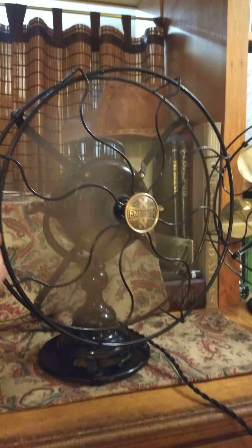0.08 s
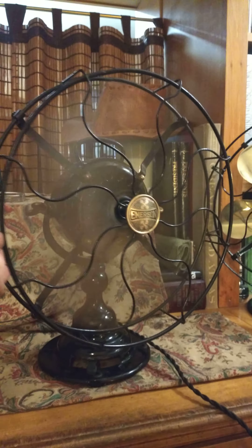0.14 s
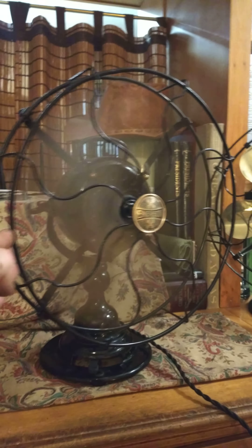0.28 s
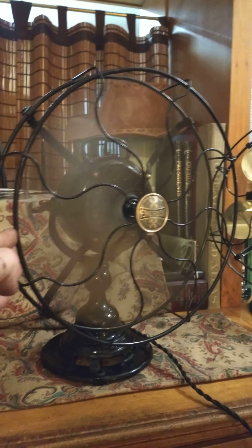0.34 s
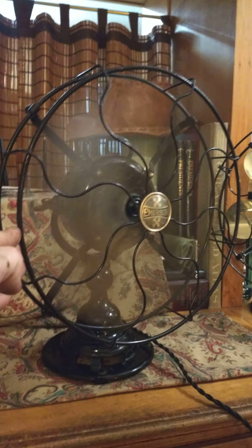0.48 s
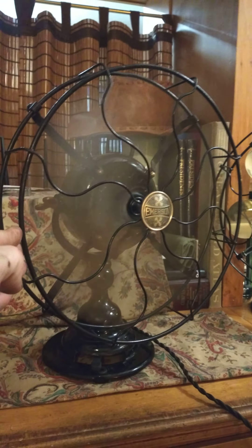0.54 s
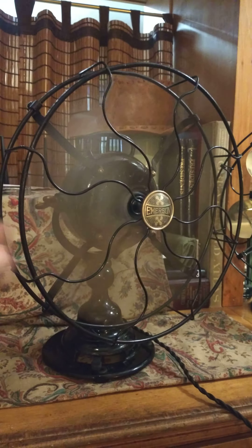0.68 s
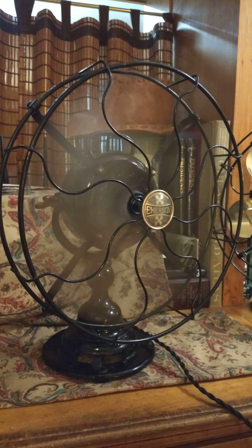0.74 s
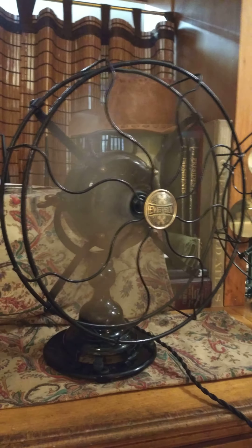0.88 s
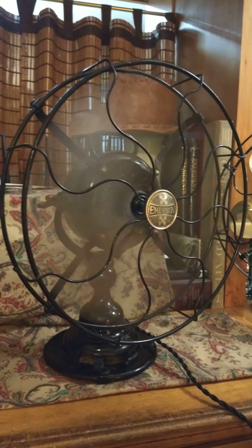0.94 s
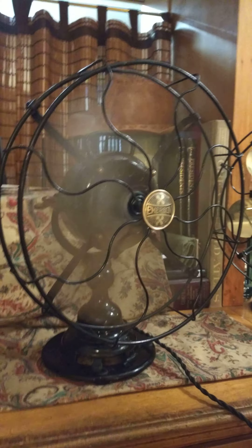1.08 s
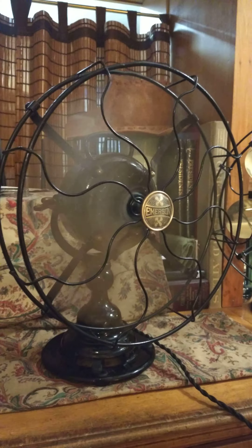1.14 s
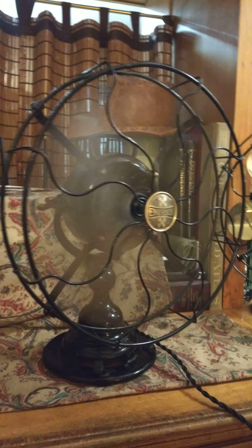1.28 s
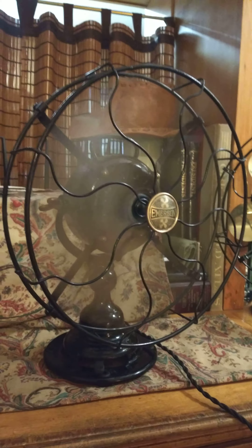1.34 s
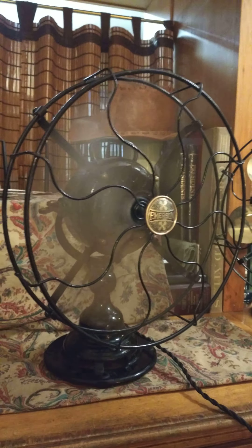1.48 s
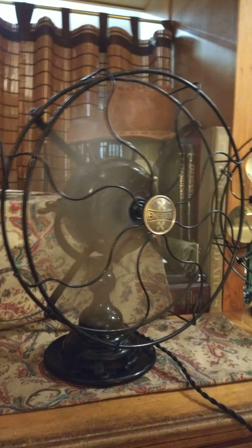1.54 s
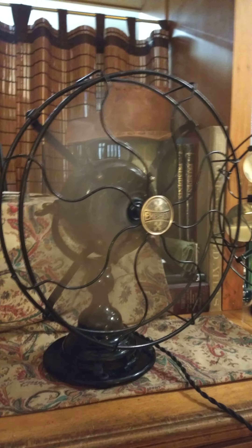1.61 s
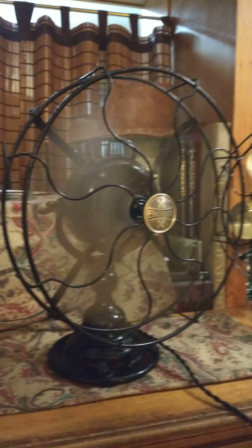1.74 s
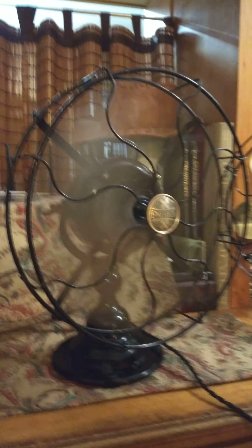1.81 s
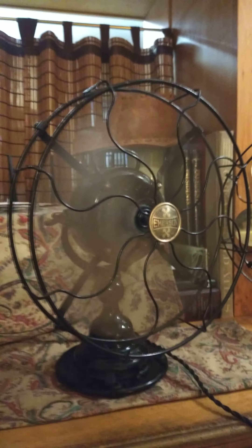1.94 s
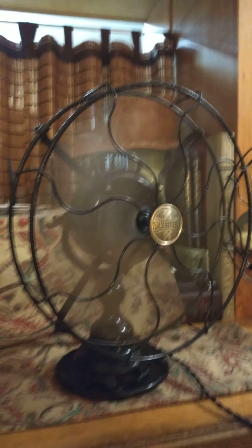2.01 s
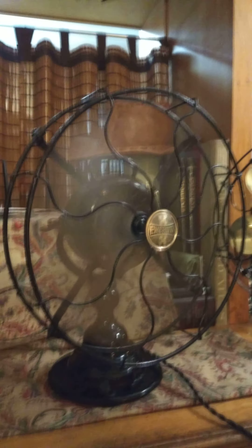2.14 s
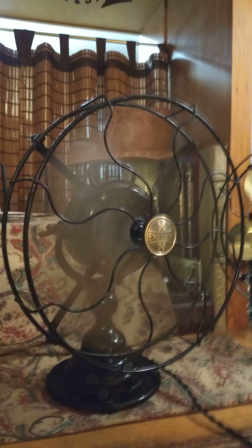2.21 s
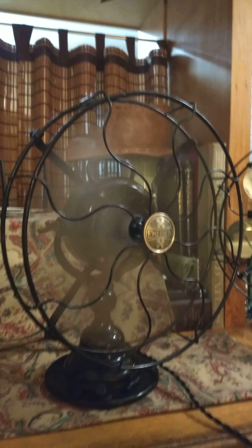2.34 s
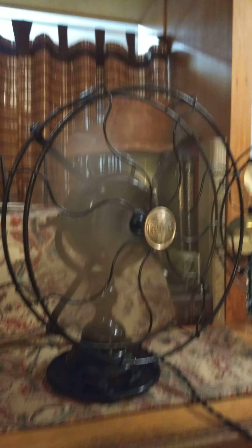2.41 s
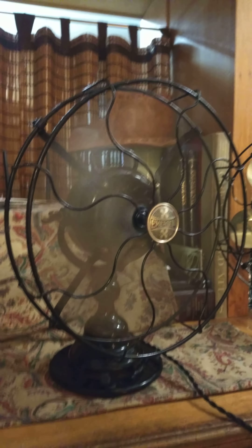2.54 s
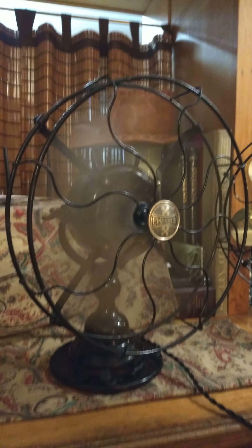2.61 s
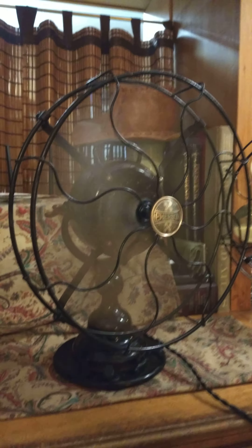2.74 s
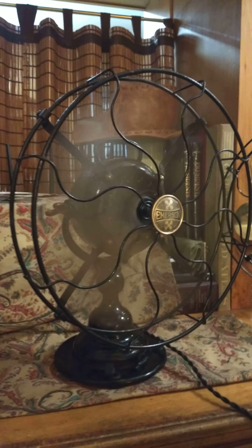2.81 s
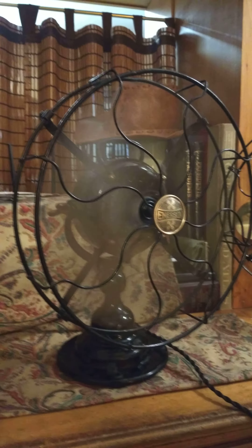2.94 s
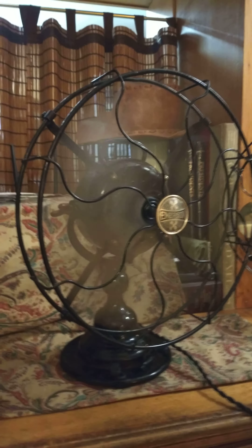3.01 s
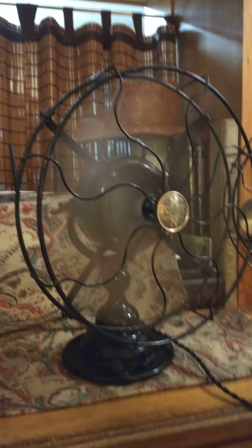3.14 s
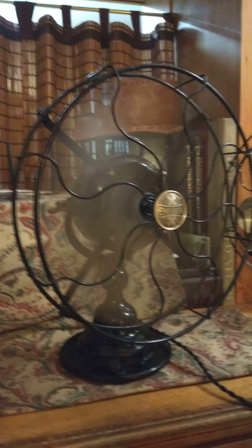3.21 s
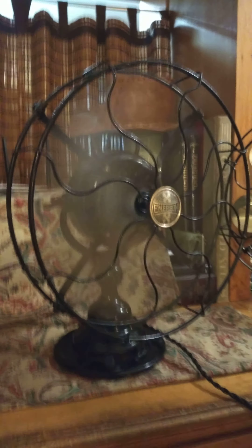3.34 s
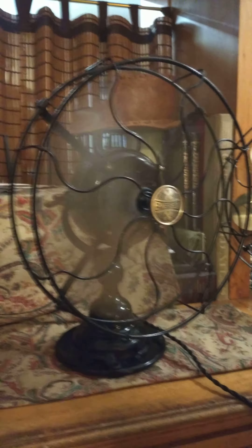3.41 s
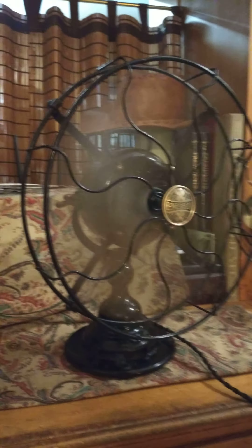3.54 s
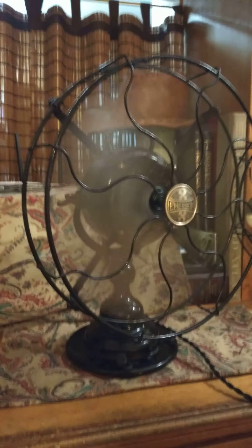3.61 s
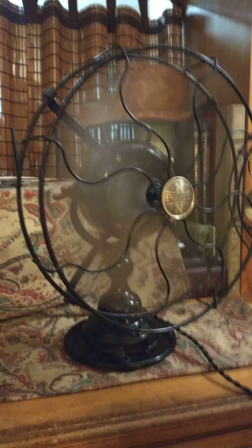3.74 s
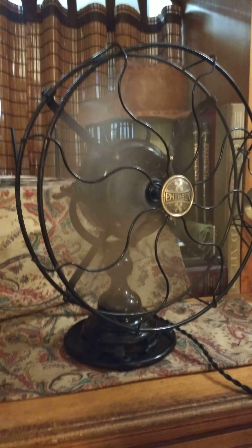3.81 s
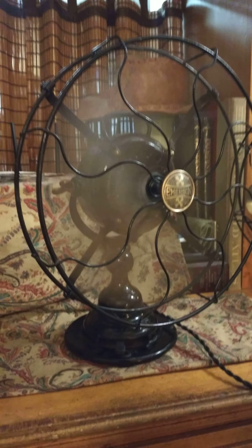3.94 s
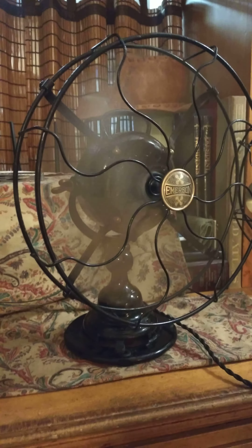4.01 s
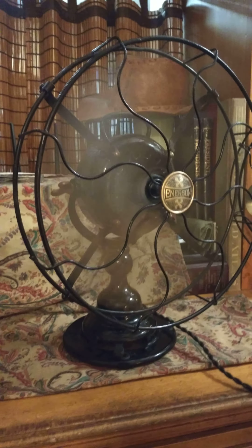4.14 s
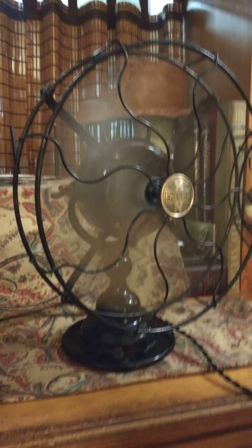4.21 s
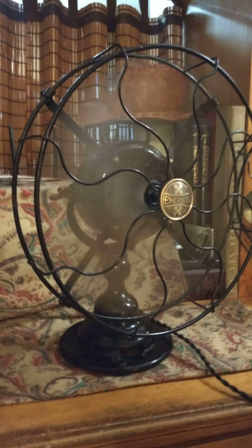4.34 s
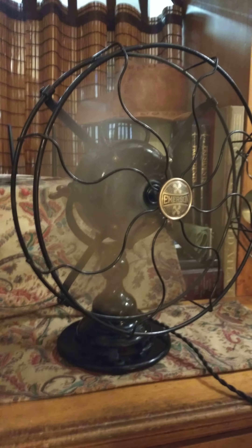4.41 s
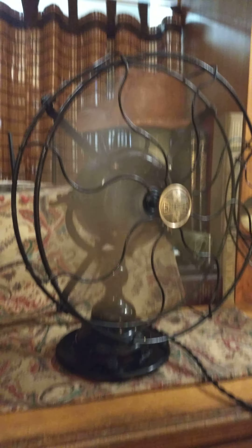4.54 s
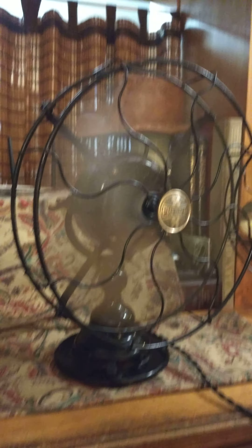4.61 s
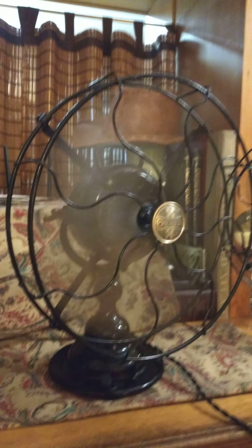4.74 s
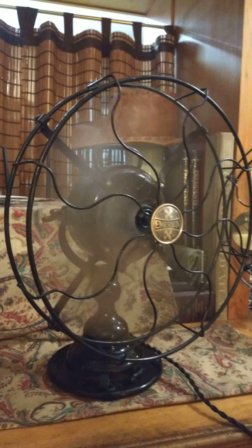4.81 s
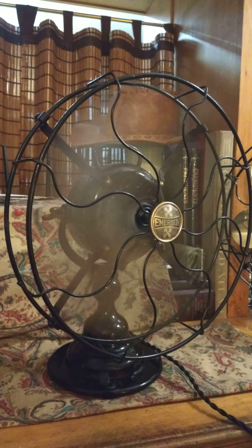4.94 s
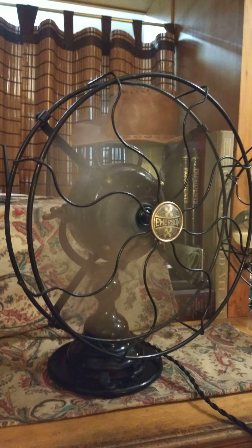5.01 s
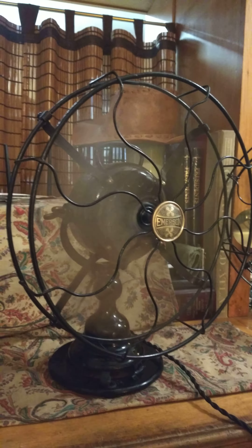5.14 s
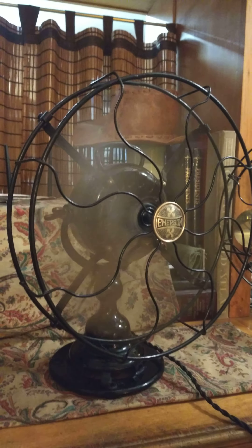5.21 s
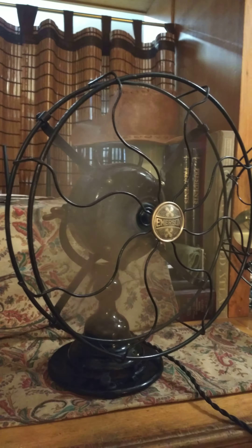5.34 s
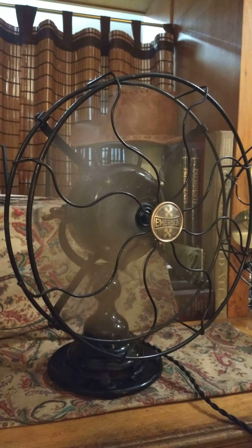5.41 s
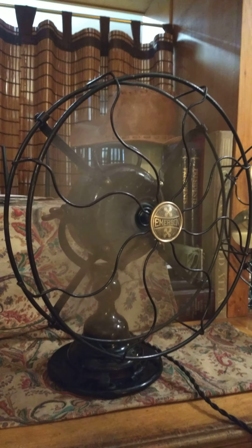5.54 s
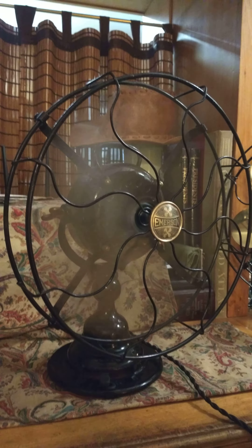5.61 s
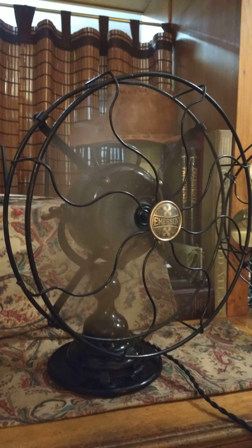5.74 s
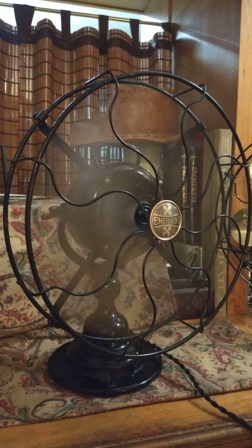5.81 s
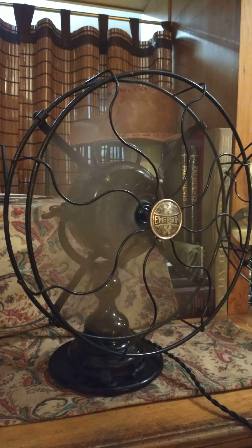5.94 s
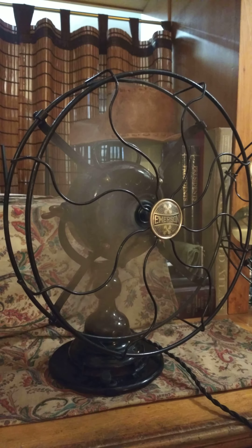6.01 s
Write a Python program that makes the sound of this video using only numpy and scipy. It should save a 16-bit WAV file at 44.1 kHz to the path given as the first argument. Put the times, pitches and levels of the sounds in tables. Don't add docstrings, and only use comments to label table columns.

```python
import sys
import numpy as np
from scipy import signal
from scipy.fft import rfft, irfft, next_fast_len
from scipy.io import wavfile
from scipy.ndimage import uniform_filter1d

SR = 44100
rng = np.random.default_rng(int(sys.argv[2]) if len(sys.argv) > 2 else 0)


def convert_level_to_amplitude(level_db):
    exponent = np.asarray(level_db, float) / 20
    return 10 ** exponent


def inscribe(sig):
    pcm = np.round(np.clip(np.atleast_2d(sig).T, -1, 1) * 32767)
    wavfile.write(sys.argv[1], SR, pcm.astype(np.int16))


N = 267687
TIME = np.arange(N) / SR
SHAFT_HZ = 27.45
PORT_LAG = 20.06


def curve(table):
    s, *columns = np.transpose(table)
    return [np.interp(TIME, s, c) for c in columns]


def over(hz, table):
    f, *columns = np.transpose(table)
    return [np.interp(np.log(hz + 1), np.log(f), c) for c in columns]


def walk(rate):
    k = int(SR / rate)
    held = np.repeat(rng.standard_normal(N // k + 1), k)
    return 1.04 * uniform_filter1d(uniform_filter1d(held, k), k)[:N]


def swells(table):
    return sum(db * np.exp(-((TIME - s) / half) ** 2) for s, db, half in table)


def grip():
    slip_s, release_s, loosen_s = 1.945, 2.03, 0.2
    s = [0, slip_s, slip_s + .012, release_s, release_s + loosen_s]
    return np.clip(np.interp(TIME, s, [0.68, 0.62, 0.42, 0.64, 0]), 0, 1)


def ports(hz):
    # f/Hz, share heard alike (+) or opposite (-), share of the rest that reaches the right port first
    # [0-1] cupped, same open, left minus right level/dB
    coherence = [(60, 0.22, .5, .5, 8), (150, 0.64, 1, 0.45, -5.5), (420, 1, 1, 0.59, 0.5),
                 (573, 0.52, 1, 0.4, 1), (784, 0.99, 0.32, 0.74, -1), (1100, 0.9, 0.39, 0.67, -0.9),
                 (1450, 0.86, 1, 0.77, 3), (1613, -0.079, 1, 0.69, 4.5), (1845, 0, 0.85, 0.69, -3.5),
                 (3350, -0.00055, 1, 0.9, -1.5), (3990, -0.15, 0.59, 0.69, 3),
                 (4750, -0.12, 0.98, 0.55, -6), (5700, 0.028, 0.58, 0.94, 0), (7800, 0.029, 1, 0.79, -3)]
    diffuse_db = -11.5
    alike, *firsts, pan_db = over(hz, coherence)
    sign, alike = np.sign(alike), np.clip(abs(alike), 0, 1)
    both, a, b, *room = rfft(rng.standard_normal((5, next_fast_len(N))))
    late = np.exp(-2j * np.pi * hz * PORT_LAG / SR)
    diffuse = convert_level_to_amplitude(diffuse_db) * np.sqrt((1 - alike) / (1 + (hz / 4000) ** 4)) * np.array(room)
    shared = np.sqrt(alike) * both
    out = []
    for first in np.clip(firsts, 0, 1):
        ahead = a * np.sqrt((1 - alike) * first)
        behind = b * np.sqrt((1 - alike) * (1 - first))
        left = shared + ahead * late + behind
        right = sign * shared - ahead - behind * late
        out.append(np.array([left * convert_level_to_amplitude(pan_db / 2), right * convert_level_to_amplitude(-pan_db / 2)]) + diffuse)
    return out


def rush(level_db, treble_db, cupped):
    # f/Hz, level/dB per Hz
    cupped_colour = [(40, -20), (95, -22), (190, -8), (420, -0.6), (600, -10.5), (850, -1.5), (1150, -0.5),
                     (1450, -0.7), (1850, 6), (3050, -30), (4000, -11), (8600, -29), (10000, -24.5),
                     (15500, -33)]
    # f/Hz, level/dB per Hz
    open_colour = [(40, -24), (95, -19), (190, -9.5), (420, -2.5), (600, -7.5), (950, -0.5), (1150, 0.0),
                   (1650, -4), (2150, -9.5), (2900, -9), (4900, -18.5), (5900, -16), (8500, -29.5),
                   (15500, -29)]
    # f/Hz, modulation depth per turn, depth per blade
    throb_depth = [(100, 0.055, 0.04), (500, 0.029, 0.018), (1200, 0.12, 0.16), (4000, 0.011, 0.13),
                   (10000, 0.024, 0.083)]
    # f/Hz, level/dB
    flicker = [(60, -4), (400, 1), (1200, 1.23), (4000, 1), (12000, 1.56)]
    size = next_fast_len(N)
    hz = np.arange(size // 2 + 1) * SR / size
    pairs = zip(ports(hz), (cupped_colour, open_colour))
    colours = [noise * convert_level_to_amplitude(over(hz, colour)[0]) for noise, colour in pairs]
    turn = 2 * np.pi * SHAFT_HZ * TIME
    shaft_throb = np.cos(turn) + 0.5 * np.cos(2 * turn + 2.6) + .5 * np.cos(3 * turn + 3.9)
    blade_throb = np.cos(4 * turn) + 0.5 * np.cos(8 * turn)
    gust, eddy, out = walk(14), walk(160), 0
    for centre in 2 ** np.arange(5, 14.6, .5):
        band = np.sqrt(np.clip(1 - abs(np.log2((hz + 1) / centre)) * 2, 0, 1))
        near, free = (irfft(c * band, size)[:, :N] for c in colours)
        per_turn, per_blade = over(centre, throb_depth)
        throb = 1 + per_turn * shaft_throb + per_blade * blade_throb
        db = over(centre, flicker)[0] * (0.6 * eddy + 0.56 * walk(150))
        db = db + 0.26 * gust + 0.083 * walk(4.7)
        db = db + treble_db * np.clip(np.log2(centre / 1800) / 0.63, 0, 1)
        out = out + (cupped * near + (1 - cupped) * free) * throb * convert_level_to_amplitude(db)
    return out * convert_level_to_amplitude(level_db + 13.5)


def puffs():
    # t/s, peak level/dB, f/Hz
    eddies = [(0.899, -21, 940), (1.994, -17.5, 906), (2.068, -21, 1230), (2.205, -18.5, 1320),
              (2.412, -14, 1180), (2.447, -13.5, 1180), (2.565, -15, 920), (2.906, -15, 890),
              (3.149, -14, 980), (3.292, -18, 1220), (3.577, -15, 1040), (3.767, -13, 1060),
              (3.958, -13, 1230), (4.068, -19, 1000), (4.142, -13.5, 906), (4.251, -11, 950),
              (4.36, -15, 1100), (4.522, -17, 1050), (4.74, -21, 1015), (4.924, -14, 1200),
              (4.96, -17, 1200), (5.479, -16.5, 980)]
    out = np.zeros(N + SR)
    t = TIME[:SR // 50]
    shape = (t / 0.0016) * np.exp(1 - t / 0.0014)
    for s, db, hz in eddies:
        start = int(s * SR)
        out[start:start + len(t)] += convert_level_to_amplitude(db - 3.5) * np.sin(2 * np.pi * hz * t) * shape
    return out[:N]


def tone(hz, left_db, right_db, lead, wander):
    z = 1 + wander * (walk(5.06) + 1j * walk(4.99))
    z = z * np.exp(2j * np.pi * (hz * TIME + rng.random()))
    left = convert_level_to_amplitude(left_db) * (z * np.exp(1j * lead)).real
    right = convert_level_to_amplitude(right_db) * z.real
    return np.sqrt(2) * np.array([left, right])


def motor(fourth_db, eighth_db, twelfth_db, gain_db):
    # shaft order, left level/dB, right level/dB, left leads/rad
    orders = [(3, -62, -52, 1.85), (4, -45.5, -47, 1.95), (6.01, -56.5, -62, -0.78),
              (8, -40.5, -38.5, 0.29), (12, -49, -50.5, -0.077), (15.13, -57.5, -53.5, 0.72),
              (16.08, -49.5, -46.5, 0.85), (16.94, -59.5, -46, 0.5), (23.7, -54.2, -57, 0.1)]
    mains_hz = 60
    out = convert_level_to_amplitude(gain_db) * tone(2 * mains_hz, -45.7, -46.2, 1.97, wander=0.05)
    swell = {4: fourth_db, 8: eighth_db, 12: twelfth_db}
    for order, *heard in orders:
        wander = .08 if order < 5 else .12 if order in swell else .6
        out = out + convert_level_to_amplitude(swell.get(order, gain_db)) * tone(order * SHAFT_HZ, *heard, wander=wander)
    return out


def handling():
    # t/s, peak level/dB, f/Hz, decay/s, length/s
    thumps = [(.001, -29, 91, .008, .015), (.029, -22, 266, 0.0023, 0.0044),
              (0.033, -18.5, 132, 0.007, 0.0072), (0.061, -34, 250, 0.0037, 0.0052),
              (.068, -20, 150, .005, 0.0035), (0.079, -30, 121, 0.013, 0.018), (0.48, -63.5, 70, .03, .05),
              (1.938, -25, 226, .004, 0.0074), (2.025, -29, 170, 0.0037, 0.0046),
              (2.086, -28, 150, .006, .022), (2.111, -21, 90, .008, 0.011), (2.169, -31, 100, .012, .03),
              (2.292, -33, 85, .03, 0.055), (2.635, -43, 65, .015, .03), (4.83, -45, 70, .02, .04)]
    # t/s, peak level/dB, f/Hz, decay/s
    ticks = [
        (1.9415, -10.5, 7600, .0003),
        (1.955, -28, 12000, .0006),
        (2.0285, -24, 6000, .0005),
        (2.1034, -11.5, 5900, .0006),
    ]
    out = np.zeros((2, N))
    t = TIME[:SR // 5]
    for s, db, hz, decay, length in thumps:
        start = int(s * SR)
        shape = np.minimum(t / 0.0025, 1) * np.exp(-np.maximum(t - length, 0) / decay)
        rub = signal.lfilter(*signal.butter(2, 3 * hz, fs=SR), rng.standard_normal(len(t)))
        lead = np.array([[0], [hz / 330]])
        knock = np.sin(2 * np.pi * hz * t * (1 - 3.5 * t) + lead) + 0.049 * rub / rub.std()
        out[:, start:start + len(t)] += convert_level_to_amplitude(db) * shape * knock * [[.95], [-1.05]]
    for s, db, hz, decay in ticks:
        left_start, right_start = int(s * SR), int(s * SR - PORT_LAG)
        crack = .6 * np.sin(2 * np.pi * hz * t) + .3 * rng.standard_normal(len(t)) + 3 * np.exp(-t / .00011)
        crack = convert_level_to_amplitude(db) * crack * np.minimum(t / .0001, 1) * np.exp(-t / decay)
        out[0, left_start:left_start + len(t)] += crack
        out[1, right_start:right_start + len(t)] -= 1.1 * crack
    return out


def scene():
    # t/s, level/dB
    aim = [
        (0, -3),
        (0.86, -1.5),
        (1.4, -0.5),
        (1.9, 0),
        (2.01, -4),
        (2.4, 0),
        (3.4, 0),
        (4.4, 0),
        (5.8, -1.5),
        (6.07, -0.5),
    ]
    # t/s, treble level/dB, half length/s
    fingers = [
        (1.968, -5, .01),
        (2.06, -2, 0.015),
        (2.23, -4, 0.13),
    ]
    # t/s, level/dB, half length/s
    eighth = [(.13, -16, 0.079), (.62, -7, 0.27), (1.02, 2.5, 0.11), (1.32, 6.5, 0.13), (1.68, -3.5, 0.087),
              (2.1, -5.5, 0.19), (2.77, 4.5, .12), (3.0, -2.5, .08), (3.47, 5, 0.093), (3.78, -18, 0.052),
              (4.18, -17, 0.094), (5.3, -3.5, 0.11), (5.9, -4, 0.071)]
    # t/s, level/dB, half length/s
    twelfth = [(.65, 14, 0.11), (1.05, 16, 0.18), (1.33, 13.5, 0.2), (1.6, 10, .06), (2.48, 14, 0.069),
               (3.12, 9.5, 0.27), (3.3, 8, 0.056), (3.55, 12, .07), (3.92, 13, 0.17), (4.27, 9, 0.066),
               (4.6, 9.5, 0.072), (5.0, 10, .12), (5.4, 11.5, 0.12), (5.85, 10, .08)]
    fade_db, fade_s = -11.5, 1.28
    rush_db, treble_db = -30, -1
    bright_per_db = -0.25
    drift_pan_db, cupped_pan_db = 0.4, -0.5
    eighth_db, twelfth_db = 0, -3
    gain_db = fade_db * np.clip(1 - TIME / fade_s, 0, 1)
    aim_db, cupped = curve(aim)[0], grip()
    treble = treble_db + bright_per_db * aim_db + swells(fingers)
    air = rush(rush_db + gain_db + aim_db, treble, cupped)
    air = air * convert_level_to_amplitude(np.outer([.5, -.5], drift_pan_db + cupped_pan_db * cupped))
    fourth_db = gain_db + np.outer((1, -8), cupped) + np.outer((1, -.3), TIME - TIME[-1] / 2)
    eighth_level = gain_db + eighth_db + swells(eighth)
    twelfth_level = gain_db + twelfth_db + swells(twelfth)
    lines = motor(fourth_db, eighth_level, twelfth_level, gain_db)
    return air + puffs() + lines + handling()


def band_limit(x):
    return signal.sosfilt(signal.butter(12, 16400, fs=SR, output="sos"), x)


def record(dry):
    low_hz, top_hz = 55, 15720
    dry = signal.sosfilt(signal.butter(3, low_hz, "high", fs=SR, output="sos"), dry)
    dry = signal.sosfilt(signal.ellip(12, .3, 60, top_hz, fs=SR, output="sos"), dry)
    return band_limit(dry)


dry = scene()
out = record(dry)
inscribe(out)
```